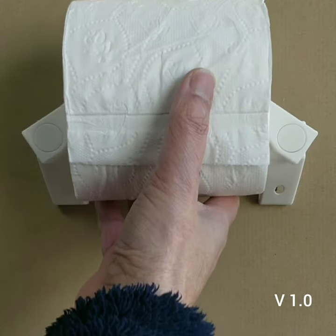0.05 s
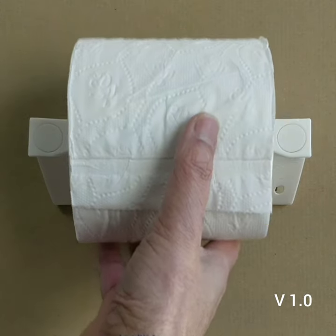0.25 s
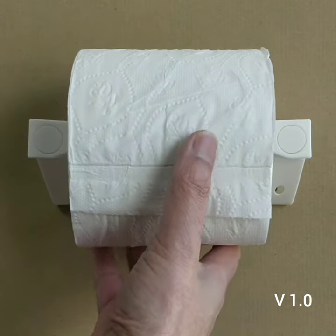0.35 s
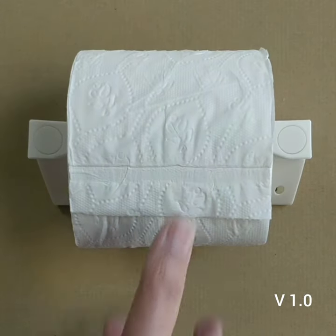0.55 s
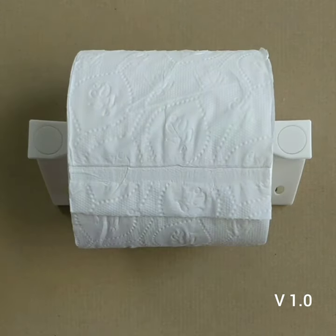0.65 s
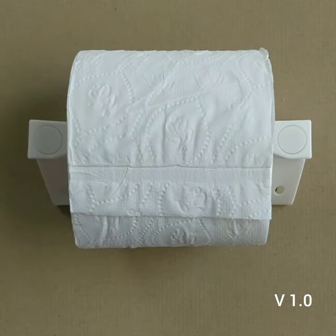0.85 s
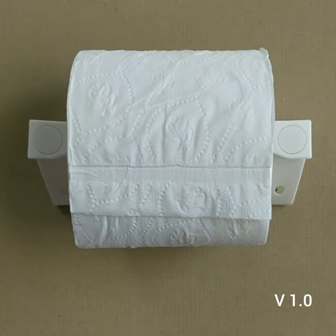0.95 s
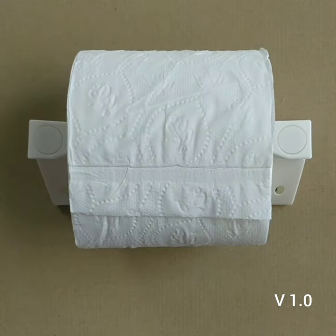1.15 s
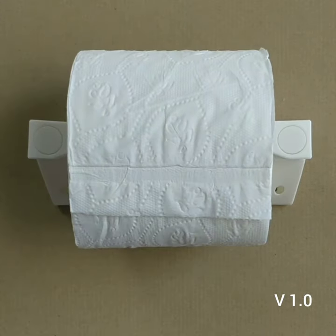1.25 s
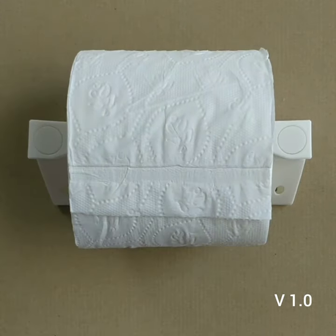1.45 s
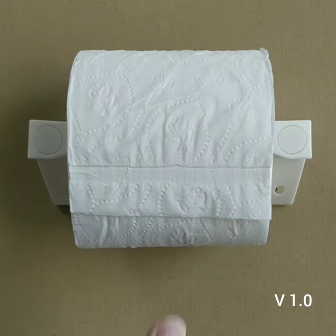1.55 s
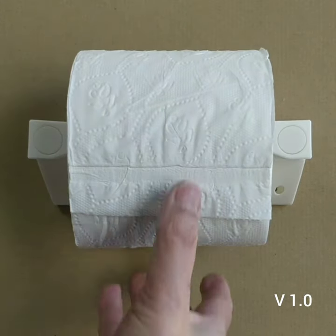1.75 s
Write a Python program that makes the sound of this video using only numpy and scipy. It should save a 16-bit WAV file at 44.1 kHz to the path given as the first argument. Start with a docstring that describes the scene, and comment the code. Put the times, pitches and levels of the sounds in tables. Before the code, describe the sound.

One sharp plastic clack from a toilet paper holder taking a roll, in a small bathroom.

```python
"""Toilet roll into a plastic wall holder

A small bathroom, one microphone close to the holder. As the roll is pulled down, two hinged arms rub
and tick, then hit their stops one just after the other: a sharp clack. The roll drops onto the arms
with a soft hollow bump and a scuff of paper, and later settles faintly. Behind it are the
reflections of close walls, a little deep rumble, quiet air and the hum of the building."""
import sys
import numpy as np
from scipy import signal
from scipy.fft import rfft, irfft
from scipy.io import wavfile

SR = 44100
rng = np.random.default_rng(int(sys.argv[2]) if len(sys.argv) > 2 else 0)


def unload_wav(signal):
    """Save mono or channel-first audio to the path in sys.argv[1] as 16-bit WAV at rate SR, clipped to [-1, 1]."""
    wavfile.write(
        sys.argv[1],
        SR,
        np.round(np.clip(np.atleast_2d(signal).T, -1, 1) * 32767).astype(np.int16),
    )


N = 79380
RISE_S, CRACK_T60_S = 0.00043, 0.037
# modes of an arm in mid swing: f/Hz, level/dB, t60/s
ARM_MODES = [(549, -21.5, 0.058), (1129, 2, .03), (1322, 4, .03), (1490, 1.5, 0.047), (1900, -14, .04),
             (2270, -22.5, .03)]


def amp(db):
    """Decibels to gain."""
    return 10 ** (np.asarray(db) / 20)


def unit(x):
    """Scales to rms 1."""
    return x / np.sqrt(np.mean(x ** 2) + 1e-20)


def curve_at(points, hz):
    """Interpolates a table on a log-frequency axis."""
    f, value = np.transpose(points)
    return np.interp(np.log(hz + 1), np.log(f + 1), value)


def add(mix, start, sound):
    """Mixes a sound in at a start time in seconds."""
    part = mix[max(round(start * SR), 0):][:len(sound)]
    part += sound[:len(part)]


def noise(colour, size):
    """Noise of rms 1 with the given spectrum."""
    gain = amp(curve_at(colour, np.fft.rfftfreq(size, 1 / SR)))
    return unit(irfft(rfft(rng.standard_normal(size)) * gain, size))


def fade(t, rise, t60):
    """Linear rise, exponential decay."""
    return np.minimum(t / rise, 1) * amp(-60 * t / t60)


def ring(modes, t, rise=RISE_S, bright_hz=SR):
    """Decaying modes of alternating sign; a softer contact leaves out the high ones."""
    out = np.zeros(len(t))
    for k, (hz, db, t60) in enumerate(modes):
        gain = (-1) ** k * amp(db) / np.hypot(1, (hz / bright_hz) ** 2)
        out += gain * fade(t, rise, t60) * np.sin(2 * np.pi * hz * t)
    return out


def arm_knocks(t):
    """The arms hit their stops: each blow rings the holder and cracks at the point of contact."""
    # blows: t/s, level/dB, brightness/Hz, contact time/s, relative crack level/dB
    blows = [(0.2186, -24, 4500, 0.0013, -2), (0.2238, -14, 3610, 0.0011, -7.5),
             (0.2885, -40.5, 3000, 0.0019, 4), (0.3152, -37.5, 4530, 0.00038, -5)]
    # modes of the plastic holder: f/Hz, level/dB, t60/s
    holder_modes = [(393, -24, .12), (566, -18, .08), (1140, -6, .035), (1290, -3, .035), (1370, -2, .06),
                    (1555, -6, .06), (1762, -11, .17), (1845, 0, .03), (2005, -15, .08), (2200, -4, .035),
                    (2395, -7, .045), (2697, -15, .05), (2905, -22, .08), (3248, -24, .06)]
    # spectrum of plastic striking plastic: f/Hz, level/dB
    crack_colour = [(60, -34), (140, -5), (450, -0.5), (800, -5.5), (1020, -3.5), (1350, 6.5), (1650, 0),
                    (1830, 6.5), (2350, 5), (2560, -10.5), (2780, 1), (3400, -6), (4200, -9), (5000, -14),
                    (6600, -22.5), (8000, -34.5)]
    out = np.zeros(N)
    for start, db, bright_hz, contact, crack_db in blows:
        ringing = .5 * ring(holder_modes, t, contact, bright_hz)
        crack = amp(crack_db) * noise(crack_colour, len(t)) * fade(t, RISE_S, CRACK_T60_S)
        add(out, start, amp(db) * (ringing + crack))
    return out


def arm_catch(t, start=.1195, db=-36.5, thud_hz=235):
    """An arm tips over its catch: one clean knock rings it, with a small thud."""
    thud = amp(-8.5) * fade(t, RISE_S, t60=.035) * np.sin(2 * np.pi * thud_hz * t)
    out = np.zeros(N)
    add(out, start, amp(db) * (.5 * ring(ARM_MODES, t) + thud))
    return out


def dry_ticks(t):
    """Light contacts at the hinge and the cardboard core give bright, quickly damped ticks."""
    # ticks: t/s, level/dB
    ticks = [(0.1168, -47.5), (0.843, -61)]
    # spectrum of a tick: f/Hz, level/dB
    tick_colour = [(150, -6), (600, 7.5), (1000, -5), (2500, 6), (3300, -6.5), (5000, -3), (6500, -12.5),
                   (8000, -22.5)]
    out = np.zeros(N)
    for start, db in ticks:
        add(out, start, amp(db) * noise(tick_colour, len(t)) * fade(t, RISE_S, t60=.027))
    return out


def hinge_rub(t, clicks_per_s=1300, grit_db=-8):
    """Each slip of a hinge sends a short run of stick-slip clicks into the swinging arm."""
    # slips: t/s, level/dB, length/s
    slips = [(0.0005, -39.5, 0.0057), (0.03, -44, .012), (0.046, -42.5, .003), (0.066, -56, .004),
             (0.093, -56, .004), (0.131, -54, 0.0072), (0.1647, -48, 0.0038), (0.179, -39, .009),
             (0.198, -35.5, .011)]
    # spectrum of dry friction in the hinge: f/Hz, level/dB
    grit_colour = [(60, -15), (200, -4), (500, 8), (850, -1.5), (1400, 0), (2000, -7), (3000, -6.5),
                   (4500, -21), (8000, -31)]
    out = np.zeros(N)
    for start, db, length in slips:
        clicks = rng.standard_normal(len(t))
        clicks *= (rng.random(len(t)) < clicks_per_s / SR) & (t < length)
        clicks[0] = 1  # every slip opens with a click
        grit = amp(grit_db) * noise(grit_colour, len(t)) * fade(t, RISE_S, CRACK_T60_S)
        arm = .5 * ring(ARM_MODES, t) + grit
        add(out, start, amp(db) * signal.fftconvolve(clicks / np.linalg.norm(clicks), arm))
    return out


def roll_drop(t):
    """The soft roll bumps on the arms and its paper scuffs against them."""
    # bumps: t/s, level/dB
    bumps = [(0.223, -39), (0.285, -47), (0.299, -45.5), (0.336, -62), (0.836, -63)]
    # spectrum of the roll's hollow body: f/Hz, level/dB
    body_colour = [(25, -22.5), (60, -18), (130, 1.5), (210, -2.5), (300, 5), (400, -1.5), (600, -7),
                   (800, -14), (1500, -29), (4000, -53.5)]
    # scuffs: t/s, level/dB, rise/s, t60/s
    scuffs = [(0.284, -48, 0.0032, 0.084), (0.832, -61, 0.0081, 0.3)]
    # spectrum of rubbing paper: f/Hz, level/dB
    paper_colour = [(150, -33), (600, 1.5), (1500, 4.5), (2500, -1), (3500, -2), (5000, -12), (6500, -1.5),
                    (8000, -17)]
    out = np.zeros(N)
    for start, db in bumps:
        add(out, start, amp(db) * noise(body_colour, len(t)) * fade(t, rise=.0045, t60=.21))
    for start, db, rise, t60 in scuffs:
        add(out, start, amp(db) * noise(paper_colour, len(t)) * fade(t, rise, t60))
    return out


def wall_reflections(direct, db=-8.5, delay_s=.006):
    """Close walls return dense reflections of random sign, each band dying at its own speed."""
    # decay of the bathroom: f/Hz, t60/s
    room_t60 = [(100, 0.15), (400, 0.3648), (1000, 0.44), (2000, 0.2932), (3000, 0.2777), (5000, 0.38),
                (8000, 0.43)]
    # spectrum of the reflections: f/Hz, level/dB
    room_colour = [(100, 0), (400, 3), (750, 1), (1200, -5), (1900, -1), (3000, 0.5), (4500, -1.5),
                   (8000, -3)]
    spacing = 16  # samples per reflection
    slots = np.arange(0, SR - spacing, spacing)
    taps = np.zeros(SR)
    taps[slots + rng.integers(0, spacing, len(slots))] = rng.choice([-1., 1.], len(slots))
    hz, t, bands = signal.stft(taps, SR, nperseg=256)
    decay = amp(-60 * t / curve_at(room_t60, hz)[:, None])
    colour = amp(curve_at(room_colour, hz))[:, None]
    tail = signal.istft(bands * decay * colour, SR, nperseg=256)[1]
    out = np.zeros(N)
    add(out, delay_s, signal.fftconvolve(direct, tail / np.linalg.norm(tail)))
    return amp(db) * out


def rumble():
    """Short, faint swells of deep bass after the drop."""
    # swells: t/s, level/dB, length/s
    swells = [(0.276, -54.5, .09), (0.399, -57, 0.16)]
    # spectrum of the rumble: f/Hz, level/dB
    bass_colour = [(15, -16.5), (28, 3), (45, -7), (80, -16.5), (200, -37.5), (1000, -85)]
    out = np.zeros(N)
    for start, db, length in swells:
        swell = np.hanning(round(length * SR))
        add(out, start, amp(db) * swell * noise(bass_colour, SR)[:len(swell)])
    return out


def room_tone(air_db=-62.5, hum_db=-72.5, hum_hz=58.9):
    """Quiet air with the faint hum of the building."""
    # spectrum of the room's air: f/Hz, level/dB
    air_colour = [(20, -14), (38, -7), (52, -0.5), (80, -10), (150, -9), (250, -17.5), (450, -22.5),
                  (1000, -25), (2200, -28.5), (4600, -34), (7800, -41)]
    hum = unit(np.sin(2 * np.pi * (hum_hz * np.arange(N) / SR + rng.random())))
    return amp(air_db) * noise(air_colour, N) + amp(hum_db) * hum


def scene():
    """Holder and roll up close, the bathroom behind them, in mono."""
    t = np.arange(SR // 2) / SR  # half a second for each contact to die away
    direct = arm_knocks(t) + arm_catch(t) + dry_ticks(t) + hinge_rub(t) + roll_drop(t)
    return (direct + wall_reflections(direct) + rumble() + room_tone())[None]


def record(dry, cutoff_hz=8050):
    """The recorder's band limit cuts off the top treble."""
    lowpass = signal.firwin(301, cutoff_hz, window=("kaiser", 8), fs=SR)
    return signal.oaconvolve(dry, lowpass[None], "same")


dry = scene()
out = record(dry)
unload_wav(out)
```